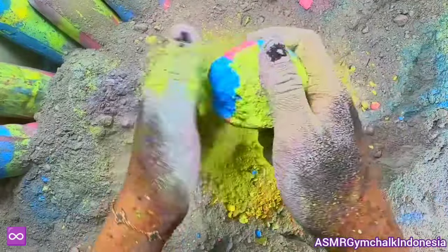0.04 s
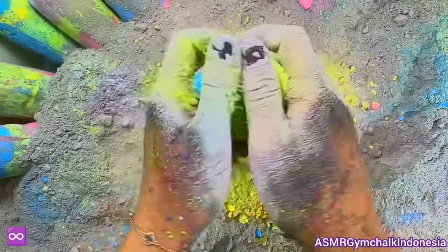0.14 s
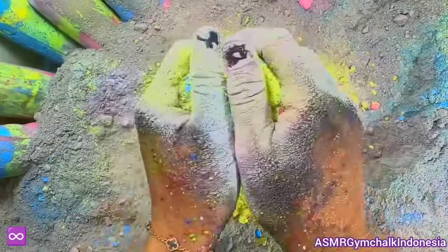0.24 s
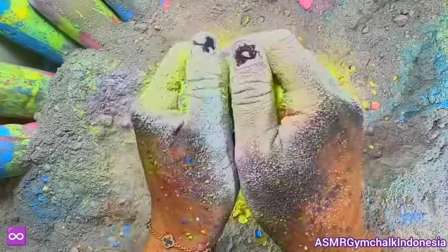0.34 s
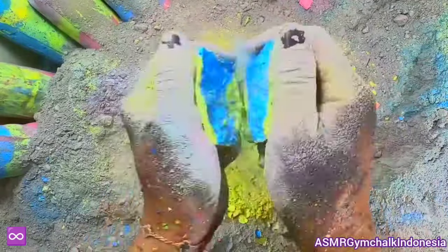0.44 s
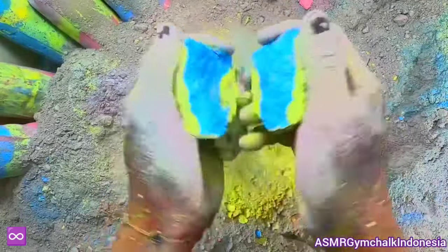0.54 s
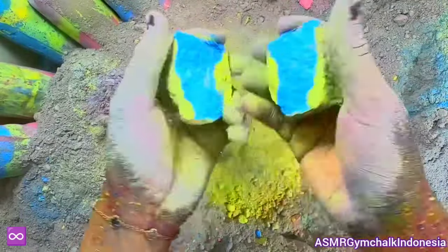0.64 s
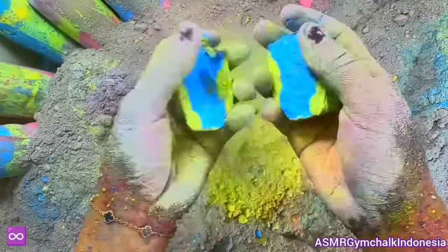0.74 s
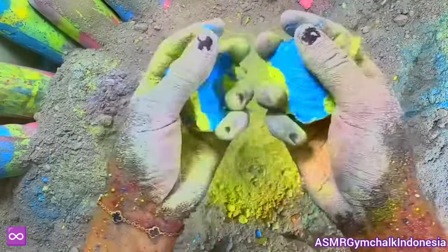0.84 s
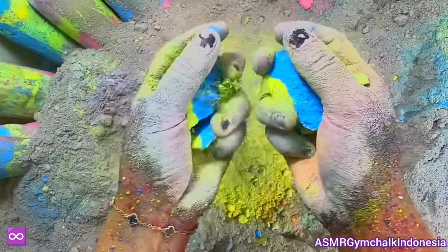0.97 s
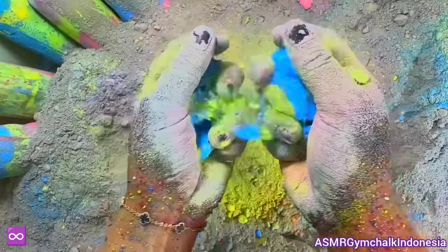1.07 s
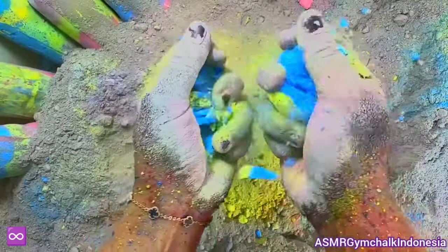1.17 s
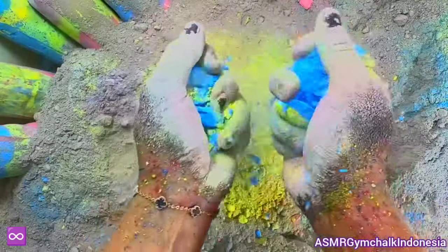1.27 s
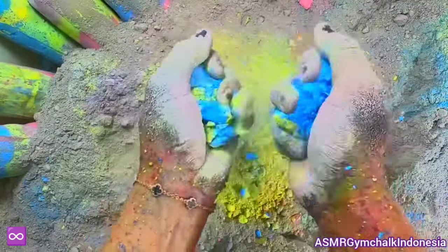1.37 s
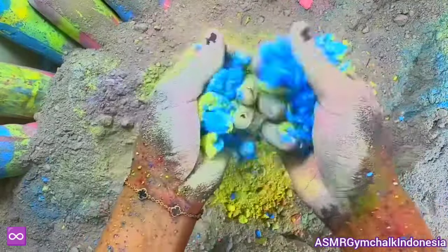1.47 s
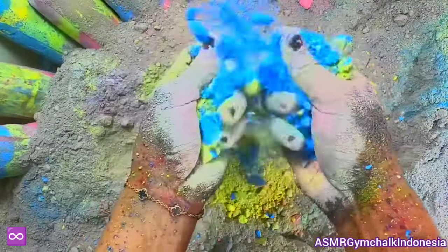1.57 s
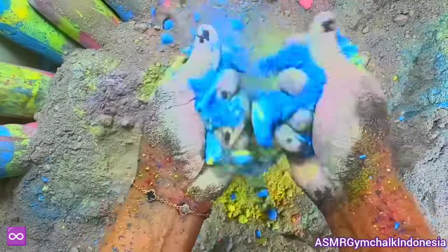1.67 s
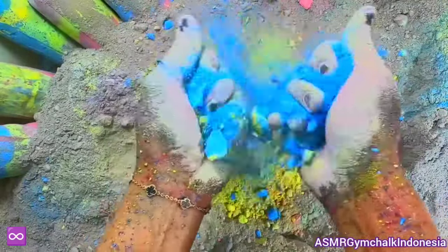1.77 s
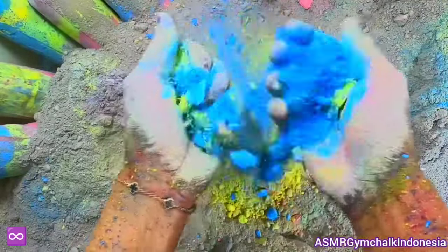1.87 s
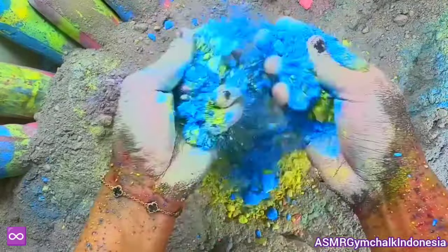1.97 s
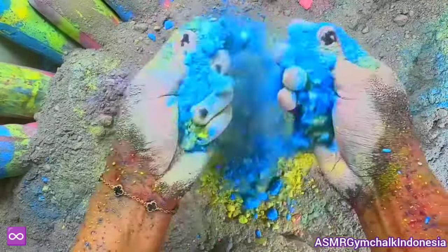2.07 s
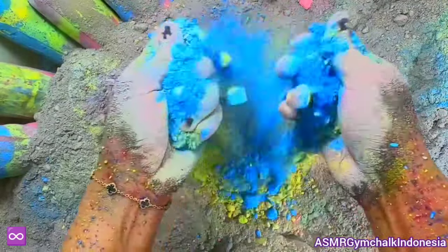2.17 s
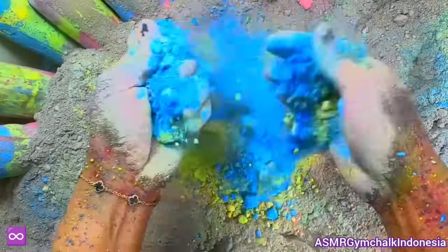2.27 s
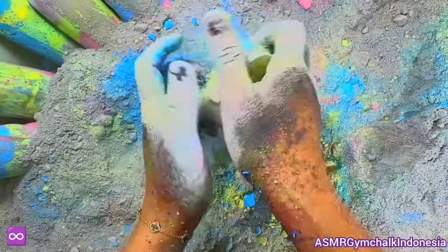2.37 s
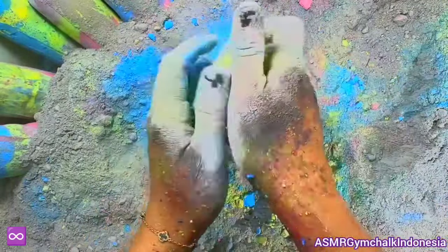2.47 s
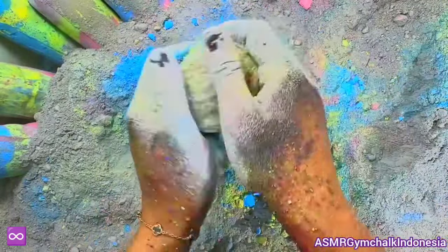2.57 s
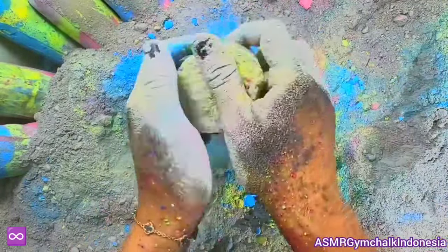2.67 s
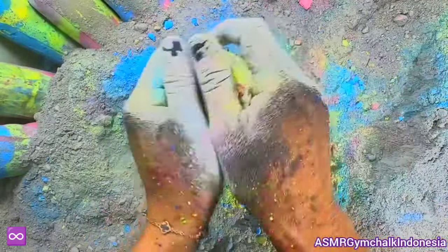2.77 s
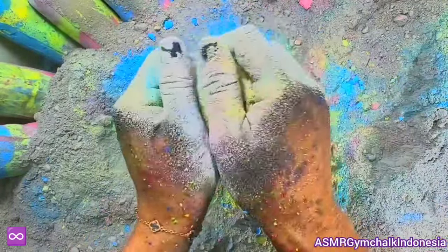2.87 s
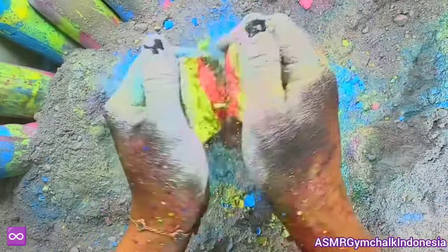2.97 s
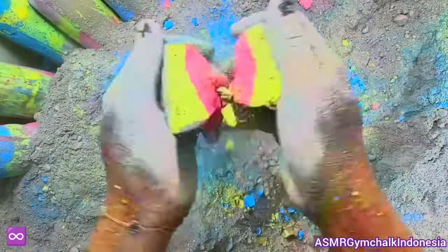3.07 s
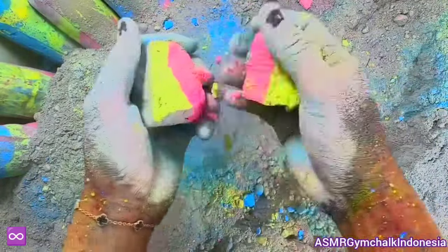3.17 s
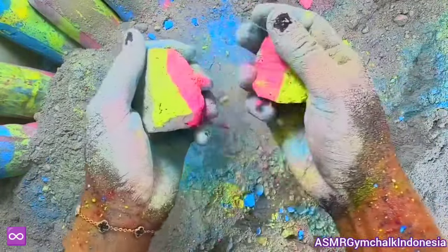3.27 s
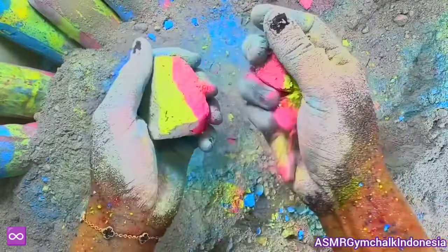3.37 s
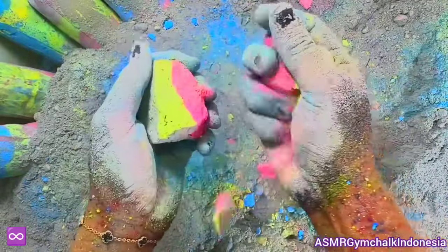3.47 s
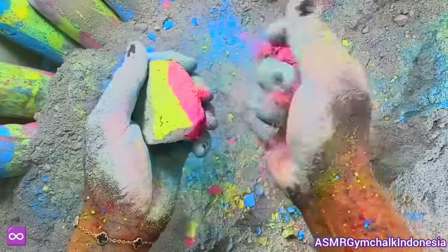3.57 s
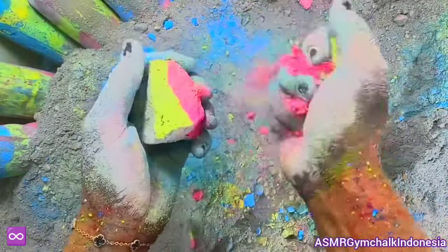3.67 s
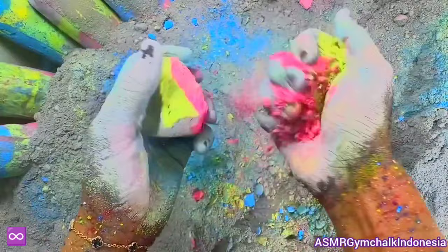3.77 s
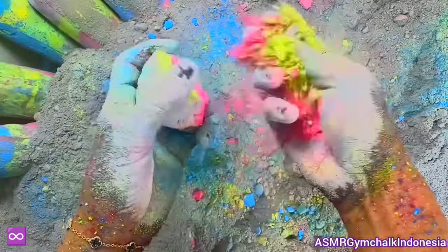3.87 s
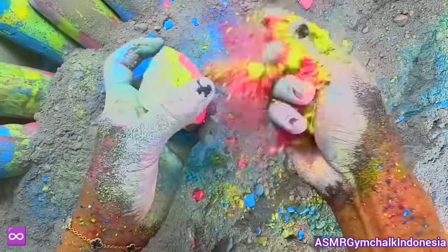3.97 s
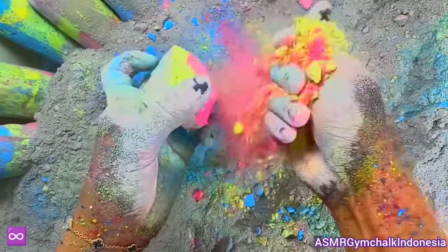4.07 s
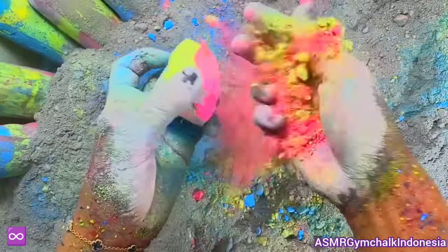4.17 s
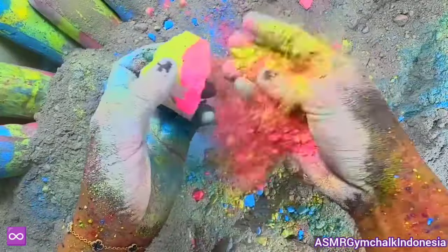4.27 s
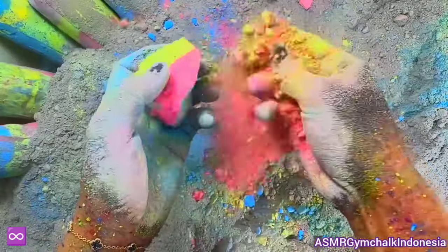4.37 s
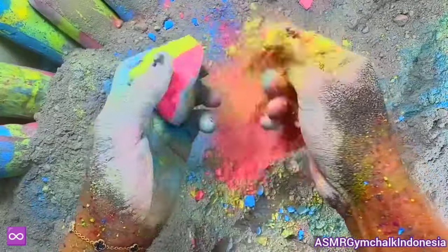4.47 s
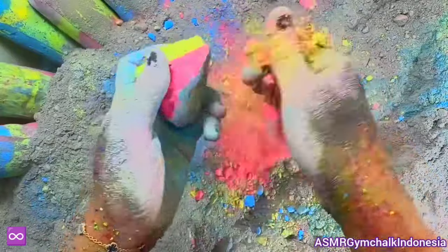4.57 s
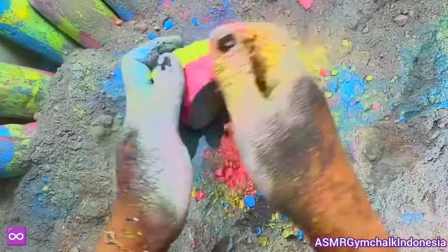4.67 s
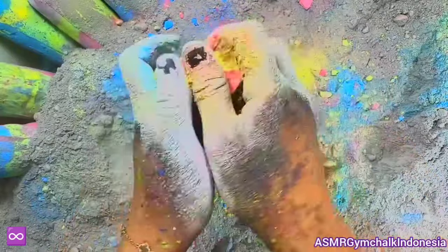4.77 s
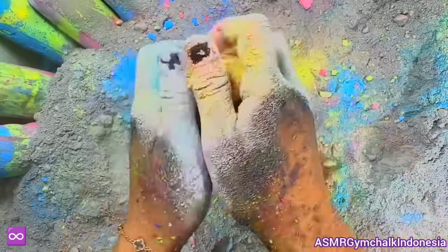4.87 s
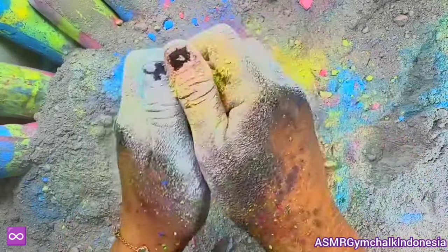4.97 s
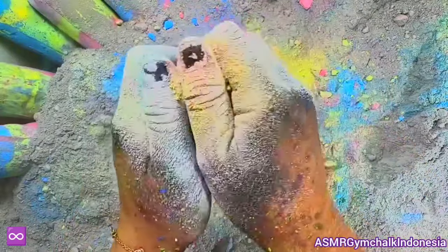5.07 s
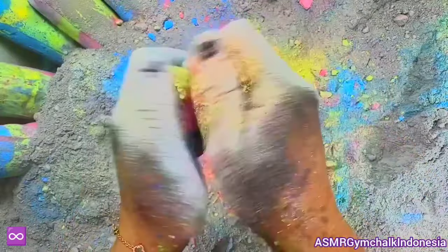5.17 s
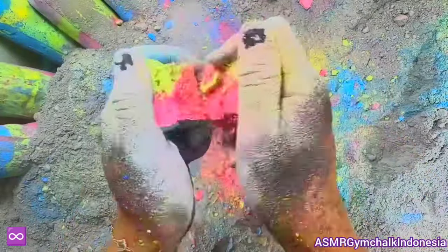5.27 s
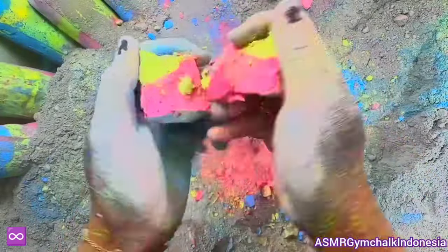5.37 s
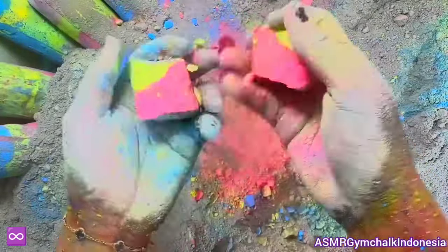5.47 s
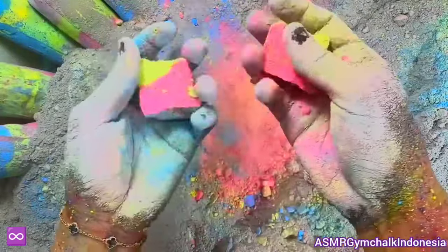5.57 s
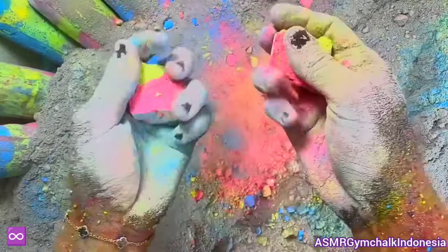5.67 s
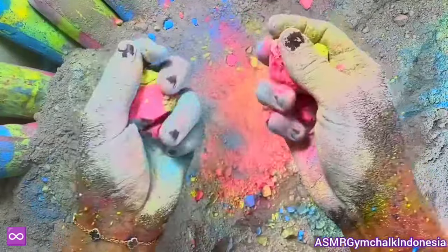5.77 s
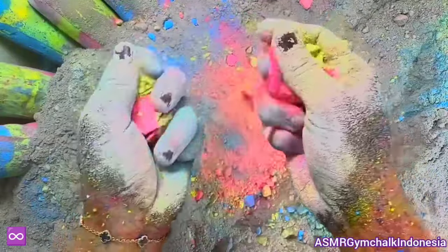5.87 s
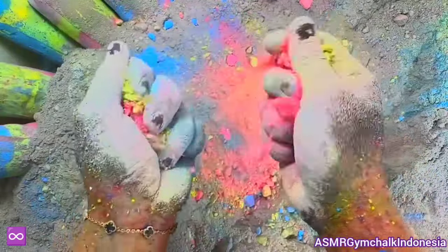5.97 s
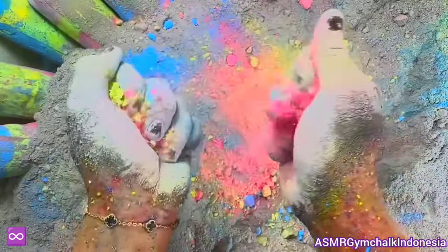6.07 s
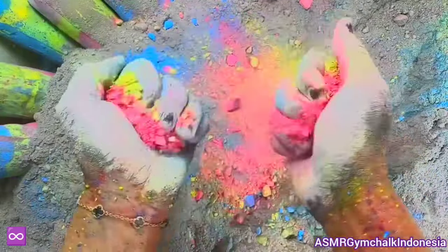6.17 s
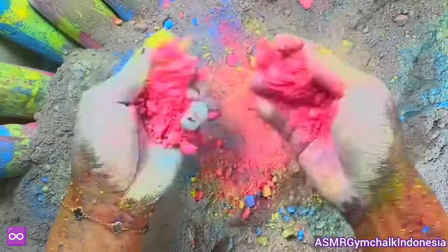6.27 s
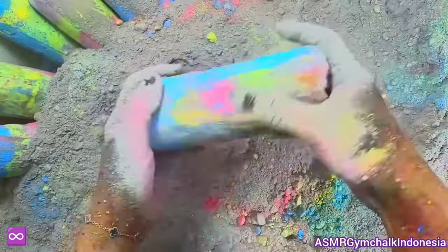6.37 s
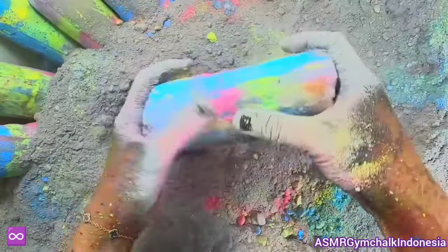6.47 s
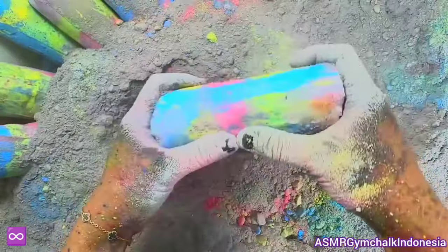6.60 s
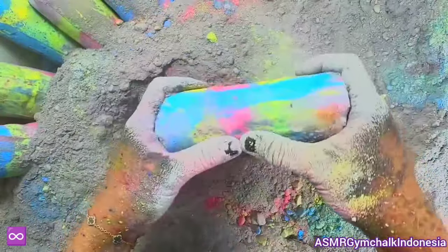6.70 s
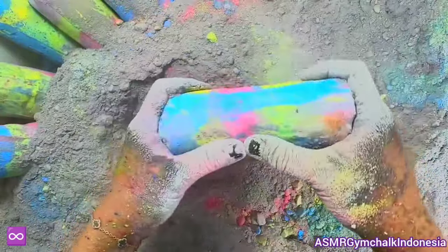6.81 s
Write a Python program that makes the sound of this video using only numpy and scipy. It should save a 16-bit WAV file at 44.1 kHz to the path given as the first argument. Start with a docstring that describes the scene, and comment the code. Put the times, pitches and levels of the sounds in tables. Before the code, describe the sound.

Brittle chalk is snapped and ground to powder in the fists. Each big break is an abrupt, distorted crack with a woody thump; after it come clustered crunches, gritty grinding and airy dust hiss, with small lumps dropping dully on a table. Quiet skin rustles separate the bursts. The microphone is very near, the room small with little reverberation.

```python
"""Gym chalk crushed by hand

Hands snap blocks of gym chalk in two and crush the halves to powder, close to a microphone over a table in a small room.
Each fracture is a burst of tiny cracks; grains grind and powder hisses between them, with bands of noise in the
hiss and rustle, some gliding in pitch. Lumps drop on the table, which rings low under every blow, from sinking
swings and decaying modes. The level dips briefly twice, and the loudest snaps overload the recorder and clip flat."""
import sys
import numpy as np
from scipy import signal
from scipy.fft import rfft, irfft
from scipy.io import wavfile
from scipy.ndimage import uniform_filter1d

SR = 44100
rng = np.random.default_rng(int(sys.argv[2]) if len(sys.argv) > 2 else 0)


def dump_mix(stems):
    """Bounce the given channels to the path in sys.argv[1] as a 16-bit WAV at rate SR."""
    frames = np.atleast_2d(stems).T  # one column per channel
    limited = np.clip(frames, -1, 1)  # hard clip at full scale
    pcm = np.round(limited * 32767).astype(np.int16)
    wavfile.write(sys.argv[1], SR, pcm)


N = 301623
TIME = np.arange(N) / SR
STEPS = TIME[::40]  # coarse clock for the motion of the hands

# Levels in the tables are relative; the functions weigh the layers against each other.
# A whole block snaps: start_s, crack_db, block_pitch_hz, treble_db, crack_decay_s,
# knock_db (on the table), push_db (deep push against the knock)
BLOCK_BREAKS = [(0.3958, 2.5, 740, -5, 0.0022, 0.5, -3.5), (2.9068, 0.5, 1200, -15.5, 0.0028, 0, -8),
                (5.1866, 1.5, 1830, -17.5, 0.003842, -5, -10), (6.834, -12, 1000, -3, 0.00306, -5, -5)]
# A lump gives way in the fist: start_s, level_db, lump_pitch_hz, lump_lift_db (at that pitch),
# treble_db, bass_db, decay_s
LUMP_CRACKS = [(.1052, -23.5, 2260, 9, -19.5, -5.5, 0.00546), (.802, -12, 3901, 7, -4, -9.5, .0049),
               (.8365, -17, 4181, 10.5, -1.5, -19, 0.001201), (.8792, -10.5, 2415, 8.5, 2, -16, 0.003195),
               (.913, -15, 3775, 6.5, 8.5, -15, 0.000542), (.9607, -7.5, 1814, 6, -2.5, -4, 0.001473),
               (.9649, -4, 2516, 9.5, -13.5, -4.5, 0.001366), (.9897, -13.5, 1164, 6, -6.5, -1, 0.001009),
               (1.0222, -3.2, 1261, 5, 2.5, -11.5, 0.00548), (1.0585, 0.5, 1339, 4.5, -9, -5.5, .0038),
               (1.0734, -0.5, 1576, 6, -10.5, -5, 0.00688), (1.078, 1.5, 2835, 7, -10.5, -5, 0.004142),
               (1.098, -6.5, 2221, 7.5, -6.5, -16.5, 0.004056), (1.114, -9, 1452, 9, -12.5, -7.5, 0.001922),
               (1.1523, -7.5, 2517, 8, -10.5, -12.5, 0.001005), (1.1673, -1.5, 1468, 9.5, -7, -12, .0026),
               (1.1766, -1, 3452, 6.5, -13, -15, .003), (1.191, -9, 2400, 5, -9, -12, .004),
               (1.239, -11, 1349, 4, -17, -15, 0.00527), (1.2609, -1.5, 1916, 5.5, -14, -16, 0.00437),
               (1.2755, -3.5, 2026, 6.5, -12, -15.5, 0.002594),
               (1.299, -13.5, 2405, 9, -13.5, -14.5, 0.001081), (1.321, -14, 2507, 5, -9.5, -14, 0.00218),
               (1.336, -14, 1894, 5, -14.5, -13.5, 0.003426), (1.666, -12, 1937, 9, -14.5, -4, 0.00337),
               (1.698, -13, 5792, 8, 5, -7, 0.00482), (1.724, -14.5, 2501, 9, 0.5, -13, 0.00373),
               (1.7839, -14, 1198, 8, -12.5, -4.5, 0.001668),
               (1.9525, -14, 2433, 4.5, -7.5, -3.5, 0.005065),
               (2.0319, -13.5, 1287, 6.5, -7.5, -3, 0.001437), (2.053, -7, 1200, 7, -22, -10, .0014),
               (2.0844, -7, 1127, 10, -28, -3.5, .0013), (2.2041, -14, 1966, 6.5, -12, -23, 0.002306),
               (2.3155, -13, 2300, 3, -13, -6, 0.0009), (2.914, -9.5, 2695, 6.5, -3, -14.5, 0.00583),
               (3.374, 1.5, 1600, 4, -12, -13.5, 0.001713), (3.3773, -0.5, 2550, 10, -9, -4, .0024),
               (3.4371, -7, 1158, 6.5, -16, -8.5, 0.002034), (3.4858, -11, 1291, 5, -12.5, -6.5, .0025),
               (3.521, 1, 1103, 3, -9, -11, .0033), (3.5661, -9, 1513, 10.5, -14, -20, 0.001317),
               (3.5892, -7.5, 1227, 6.5, -8, -9, 0.00446), (4.1887, -20, 897.7, 8.5, -15, -13, 0.00288),
               (4.3538, -16, 734.4, 8, -2.5, -1.5, 0.002532), (4.422, -8, 1135, 11, -29, -7, 0.002006),
               (4.726, -16.5, 1366, 5, -13, -5, 0.0035), (5.0877, -14.5, 1799, 8, -8.5, -19.5, 0.005247),
               (5.2531, -14.5, 1643, 7, -8.5, -12.5, 0.00261), (5.553, -22, 1430, 6, -11.5, -16, 0.00216),
               (5.6755, -11.5, 2769, 3, -5.5, -10, 0.0007666),
               (5.7141, -10, 1300, 8.5, -11.5, -4.5, 0.002403),
               (5.722, -11, 1787, 5.5, -2.5, -14, 0.003234), (5.7655, -19.5, 6487, 8.5, 1, -15.5, 0.001186),
               (5.7935, -7.5, 2633, 6.5, -9, -4.5, 0.006), (5.802, -7, 3967, 7, -6, -6.5, 0.003302),
               (5.8291, -12.5, 2000, 5, -10.5, -17.5, 0.00328), (5.839, -12, 1599, 4, -9, -13.5, 0.00185),
               (5.861, -14, 3000, 3.5, -4, -16, 0.0015), (5.8835, 0, 2751, 6.5, -14, -11.5, 0.002834),
               (5.8891, 1, 1910, 4.5, -14.5, -12, 0.004585), (5.9128, -7, 1032, 3.5, -12, -12, 0.004),
               (5.9527, -7, 2668, 4, -6.5, -22, 0.0056), (5.9609, -6.5, 2827, 6, -10, -15, 0.00282),
               (6.028, -10, 3808, 7, -15.5, -19, 0.00352), (6.0506, -9.5, 1178, 6.5, -9.5, -20, 0.00474),]
# A fist closes on chalk: start_s, tightening_s, hold_s, ease_s (to fall 20 dB),
# grind_db, powder_db, coarse_share (0 to 1)
FIST_SQUEEZES = [(0.095, 0.00962, 0.02126, 0.0867, -35.5, -36.5, 0.39),
                 (0.385, 0.00922, 0.04663, 0.0957, -37, -43, 0.46),
                 (0.772, 0.02984, 0.0913, 0.08, -35.5, -32.5, 0.83),
                 (0.889, 0.062, 0.08773, 0.1187, -26.5, -32.5, 0.95),
                 (1.04, 0.03965, 0.02494, 0.095, -17.5, -23, 0.78),
                 (1.158, 0.00942, 0.0333, 0.105, -19.5, -28, 0.87),
                 (1.239, 0.02863, 0.03951, 0.2162, -21.5, -28, 0.65),
                 (1.449, 0.0262, 0.02609, 0.2567, -24, -33.5, .15),
                 (1.56, 0.07349, 0.10143, 0.283, -22, -27.5, 0.34),
                 (1.887, 0.04662, 0.18814, 0.2116, -27, -35.5, 0.61),
                 (2.177, 0.0244, 0.10942, 0.0177, -31, -36, 0.35),
                 (3.36, 0.01471, 0.0212, 0.3244, -23.5, -31, 0.67),
                 (3.509, 0.06995, 0.01818, 0.2611, -21, -28.5, 0.61),
                 (3.789, 0.04999, 0.13304, 0.3927, -26, -36.5, 0.16),
                 (4.28, 0.05352, 0.18464, 0.1766, -27.5, -34, .3),
                 (4.636, 0.03388, 0.0459, 0.2431, -32.5, -36.5, 0.43),
                 (5.181, 0.00968, 0.02044, 0.1196, -26.5, -33, 0.45),
                 (5.664, 0.22026, 0.08795, 0.3971, -21, -27.5, 0.45),
                 (6.219, 0.037, 0.09742, 0.0969, -32, -38, 0.16)]
# Dusty skin slides over the chalk: middle_s, length_s, hiss_db, rustle_db
SKIN_RUBS = [(0.017, 0.1248, -32.5, -39.5), (0.199, 0.1827, -39, -53.5), (0.343, 0.172, -47, -42.5),
             (0.66, 0.24, -39.5, -56), (2.364, 0.1334, -38, -42.5), (2.482, 0.099, -41, -52),
             (2.595, 0.2182, -34, -41.5), (2.749, 0.1462, -43, -43), (2.853, 0.163, -42, -36.5),
             (2.983, 0.187, -44, -37.5), (3.108, 0.1412, -37.5, -37.5), (3.223, 0.12204, -36.5, -41.5),
             (3.332, .12, -43, -36), (4.17, 0.19016, -36.5, -35.5), (4.63, 0.135, -38, -42),
             (4.86, 0.2147, -36, -42), (5.077, 0.1333, -45, -42), (5.42, 0.21, -35, -42),
             (5.615, 0.2013, -36, -37), (6.449, 0.1644, -36, -40), (6.565, 0.12, -45.5, -43.5),
             (6.731, 0.1676, -47.5, -42)]
# Crumbs spill onto the table: start_s, length_s, fade_s (to fall 20 dB), level_db
CRUMB_SPILLS = [(0.0, 0.02607, 0.2848, -33.5), (0.396, 0.0424, 0.2364, -29.5), (0.791, 0.3544, 0.3856, -31),
                (1.578, 0.23422, 0.0629, -26.5), (1.937, 0.0809, 0.0009, -29.5),
                (2.043, 0.18263, 0.0958, -25.5), (2.72, 0.137, 0.8982, -37.5),
                (2.879, 0.09477, 0.2388, -27.5), (3.066, 0.33, 0.2692, -31.5), (3.443, 0.1412, 0.3402, -26),
                (3.883, 0.14635, 0.2866, -31.5), (4.311, 0.08717, 0.3977, -29),
                (4.63, 0.08774, 0.2953, -33.5), (5.19, 0.03704, 0.1237, -28), (5.531, 0.0981, 0.297, -35.5),
                (5.628, 0.0498, 0.091, -28), (5.779, 0.5384, 0.22, -31), (6.388, 0.3967, 0.1916, -36.5)]
# Narrow and wide bands of noise in the hiss and rustle, some gliding in pitch: middle_s, length_s,
# pitch_hz, glide_octaves_per_s, width_hz, level_db
NOISE_BANDS = [(0.019, 0.0736, 6958, 0.102, 400, -38), (.17, 0.1229, 6115, 0.068, 200, -43.5),
               (1.48, 0.0455, 1924, -0.792, 160, -25), (1.66, 0.14095, 1202, -0.214, 200, -28.5),
               (3.13, .4, 900, .3, 250, -41), (3.21, .09, 520, 0, 120, -35),
               (3.845, 0.05936, 2763, -0.594, 600, -29), (3.885, 0.05847, 1846, -0.947, 250, -30.5),
               (3.94, .16, 1244, -0.0037, 140.3, -30), (5.47, 0.0546, 7939, 0.107, 250, -39.5)]
# A loose crumb ticks on the heap: start_s, level_db, pitch_hz
CRUMB_TICKS = [(.128, -21, 2600), (.932, -20, 1200), (1.613, -20, 1250), (1.641, -19, 1200),
               (2.074, -16, 950), (2.107, -18, 1100), (4.465, -22, 1700), (4.534, -25, 1300),
               (4.631, -29, 1500), (4.659, -26.5, 1500), (4.686, -25, 1700), (4.711, -24, 750),
               (4.797, -25, 1400), (4.911, -29, 1550)]
# Partials of a crumb: ratio (to its pitch)
CRUMB_RATIOS = [1, 1.6, 2.5]
# A lump lands on the table: start_s, level_db, pitch_hz, decay_s, push_db (deep push against the knock)
LUMP_THUDS = [(.008, -5.5, 288.4, 0.01086, -2.5), (.290, -21, 449.3, 0.005025, -13),
              (1.082, -7, 337.6, 0.00619, -7), (1.116, -15, 334.9, 0.00483, -6),
              (1.18, -16, 335.9, 0.00512, 0.5), (1.277, -18, 150, .006, 0),
              (1.578, -6.5, 416.5, 0.004386, -14.5), (1.785, -12.5, 342.1, 0.00548, -11),
              (2.129, -17, 480, 0.00471, -10), (2.668, -23, 380, .005, -10),
              (2.8797, -8.5, 401.7, 0.004242, -10.5), (3.379, -15, 335, 0.005355, -8),
              (3.526, -14, 320, .005, -1), (4.037, -10.5, 96.28, 0.01428, -12.5),
              (5.644, -6.5, 349.9, 0.004, -9), (6.287, -9.5, 460.5, .0075, -17),
              (6.696, -12, 363.1, 0.004384, -11.5)]
# Modes of the table: pitch_hz, level_db, t60_s
TABLE_MODES = [(96.626, -10, 0.1479), (128.63, -15, 0.08485), (169.02, -14, 0.0494),
               (310.44, -12.5, 0.0792), (333.89, 0, 0.16976), (374.24, -13.5, 0.1019), (486.79, -11, 0.12),
               (721.51, -16, 0.0912), (774.45, -17, 0.1105)]
# Resonances of the hollow between hands and table: pitch_hz, lift_db
HOLLOW_MODES = [(1100, 3), (1380, 2.5), (1551, 2), (1889, 4), (2126, 1.5), (2429, 5), (2771, 5.5),
                (3126, 3.5), (3484, 3)]
# Spectra of the noisy layers: pitch_hz, level_db (per Hz)
CRACK_SPECTRUM = [(60, -31), (200, 0.5), (400, 5), (800, 0.5), (1400, -1), (2700, -4.5), (4800, -6),
                  (6500, -4), (9000, -10.5), (11500, -30), (16000, -38.5)]
GRIND_SPECTRUM = [(100, 4), (200, -4.5), (500, -4), (800, -1.5), (1200, 0), (2000, -2), (2900, -5),
                  (4500, -9), (8000, -21.5), (16000, -62.5)]
POWDER_SPECTRUM = [(800, -54), (2500, -2), (4000, 0), (5000, -2), (6100, 4), (8000, 1), (9500, -1),
                   (11000, -33), (13500, -35), (15500, -8)]
PATTER_SPECTRUM = [(80, -10.5), (230, -14), (290, -5.5), (333, 5), (425, -11), (490, 5), (620, -5),
                   (850, -6), (1300, -16.5), (3000, -54)]
RUMBLE_SPECTRUM = [(15, -43.5), (33, -26.5), (48, -2), (62, 0.5), (78, -4), (95, 4.5), (125, -7),
                   (200, -13), (280, -12.5), (332, -3), (420, -15.5), (490, -10), (1500, -72)]
# A lump against a whole block: pitch_hz, level_db
LUMP_SPECTRUM = [(400, 5.5), (1200, 0), (2500, 0.7785), (6000, 4)]
# Width of the sound: pitch_hz, side_db (against mid)
STEREO_WIDTH = [(60, -23.5), (130, -13), (330, -11.5), (520, -6.5), (720, 0), (1000, -4.5), (1700, -18),
                (2600, -6.5), (4400, -3.5), (8000, -3.5), (10000, 10.5), (12000, 27.5), (15000, 13.5)]
# Reverberation of the small room: pitch_hz, t60_s
ROOM_DECAY = [(100, 0.15), (400, 0.1683), (1500, 0.15926), (5000, 0.1944), (12000, 0.04384)]
# The level drops abruptly and comes back: start_s, held_s, recovery_s, depth_db
LEVEL_DIPS = [(2.319, 0.00785, 0.03367, -10.5), (6.364, 0.012837, 0.00321, -22.5)]

GRIP_FLOOR_DB, POWDER_FLOOR_DB = -54, -60  # faint stir of dusty hands between squeezes
SPILL_RISE_S, PATTER_FLOOR_DB = 0.02731, -50.5
# the hands at rest, straining, and letting go
RUMBLE_FLOOR_DB, RUMBLE_GRIP_DB, RUMBLE_SPILL_DB = -38.5, -15, -9.5
CRUMB_CYCLES = 1.6  # swings until a crumb's partial has died to about a third
EDGE_HZ = 15850  # upper band limit


def amp(db):
    """Turns decibels into an amplitude factor."""
    return 10 ** (np.asarray(db) / 20)


def unit(x):
    """Scales to an rms of one."""
    return x / np.sqrt(np.mean(x ** 2) + 1e-20)


def read(points, hz):
    """Reads a table of values on a log-frequency axis."""
    f, value = np.transpose(points)
    return np.interp(np.log(hz + 1), np.log(f + 1), value)


def add(mix, s, sound):
    """Lays a sound into the mix at a time in seconds, cut off at the end."""
    part = mix[:, max(round(s * SR), 0):][:, :sound.shape[1]]
    part += sound[:, :part.shape[1]]


def coloured(drive, colour, extra_db=lambda hz: 0, size=4096):
    """Minimum-phase filter for a mid and side pair; white noise keeps its power in the mid."""
    hz = np.fft.rfftfreq(size, 1 / SR)
    mid_db = read(colour, hz) + extra_db(hz)
    side_db = mid_db + read(STEREO_WIDTH, hz)
    cepstrum = irfft(np.log(amp([mid_db, side_db])))
    # fold the cepstrum forward in time: the filter becomes causal
    cepstrum[:, 1:size // 2] *= 2
    cepstrum[:, size // 2 + 1:] = 0
    taps = irfft(np.exp(rfft(cepstrum)))
    taps /= np.linalg.norm(taps[0])
    return signal.fftconvolve(drive, taps, axes=1)[:, :drive.shape[1]]


def shelves(hz, treble_db, bass_db, treble_hz=4000, bass_hz=650):
    """Lifts or lowers the two ends of a spectrum."""
    treble = treble_db / (1 + (treble_hz / (hz + 1)) ** 4)
    bass = bass_db / (1 + (hz / bass_hz) ** 4)
    return treble + bass


def bump(hz, pitch_hz, lift_db, octaves):
    """One broad resonance, bell-shaped over octaves."""
    return lift_db * np.exp(-(np.log2((hz + 1) / pitch_hz) / octaves) ** 2)


def grains(count, per_s, spread_db, grain_s, smooth):
    """Tiny fractures of very unequal size over a smooth rub, as mid and side noise."""
    sizes = amp(spread_db * np.minimum(rng.exponential(1, count), 4.5))
    clicks = sizes * (rng.random(count) < per_s / SR)
    power = signal.lfilter([1], [1, -np.exp(-1 / (grain_s * SR))], clicks ** 2)
    strength = np.sqrt(power / (power.mean() + 1e-20) + smooth)
    return unit(strength * rng.standard_normal((2, count)))


def fracture(decay_s, crumbs_db, crumbs_s, slip_s=0.00047, rise_s=0.0004592, count=4000):
    """One sharp slip, a burst of smaller ones as the crack runs on, and a trail of crumbs."""
    t = np.arange(count) / SR
    rise = 1 - np.exp(-t / rise_s)
    burst = grains(count, per_s=2500, spread_db=1.9, grain_s=.0004, smooth=.6)
    burst *= np.exp(-t / decay_s) * rise
    burst /= np.linalg.norm(burst[0])
    # the shorter the crack, the more of it is the first slip
    burst[:, round(.0005 * SR)] += slip_s / decay_s * rng.choice([-1, 1], 2)
    trail = grains(count, per_s=500, spread_db=2.0, grain_s=0.000535, smooth=0.3653)
    trail *= np.exp(-t / crumbs_s) * rise
    sound = burst / np.linalg.norm(burst[0]) + amp(crumbs_db) * trail / np.linalg.norm(trail[0])
    return sound * np.sqrt(.002 * SR)  # the burst gets the energy of 2 ms at an rms of one


def breaks(block_octaves=.45, block_db=6):
    """A whole block parts with a loud crack, coloured by its own resonance."""
    out = np.zeros((2, N))
    for s, db, block_hz, treble_db, decay_s, *_ in BLOCK_BREAKS:
        def tone(hz):
            return shelves(hz, treble_db, -9) + bump(hz, block_hz, block_db, block_octaves)
        burst = fracture(decay_s, crumbs_db=-17, crumbs_s=.016)
        add(out, s, amp(db) * coloured(burst, CRACK_SPECTRUM, tone))
    return out


def cracks(lump_octaves=0.2537):
    """Lumps collapse in the fist, each with a dull resonance of its own."""
    out = np.zeros((2, N))
    for s, db, pitch_hz, lump_db, treble_db, bass_db, decay_s in LUMP_CRACKS:
        def tone(hz):
            lump = bump(hz, pitch_hz, lump_db, lump_octaves)
            return lump + shelves(hz, treble_db, bass_db) + read(LUMP_SPECTRUM, hz)
        burst = fracture(decay_s, crumbs_db=-9, crumbs_s=0.014)
        add(out, s, amp(db) * coloured(burst, CRACK_SPECTRUM, tone, size=2048))
    return out


def envelope(start_s, attack_s, hold_s, release_s):
    """Rises, holds, then falls by 20 dB in every release time."""
    t = STEPS - start_s
    rise = np.clip(t / attack_s, 0, 1)
    return rise * amp(-20 * np.maximum(t - attack_s - hold_s, 0) / release_s)


def together(gains):
    """Unrelated sounds add in power."""
    return np.sqrt(sum(gain ** 2 for gain in gains))


def handwork():
    """Strength of coarse and fine grinding, hiss, patter and rumble as the hands squeeze, rub and spill."""
    grips = []
    for *shape, grind_db, powder_db, share in FIST_SQUEEZES:
        grips.append((envelope(*shape), grind_db, powder_db, share))
    for s, length, hiss_db, rustle_db in SKIN_RUBS:
        stroke = np.exp(-(2 * (STEPS - s) / length) ** 2)
        grips.append((stroke, rustle_db, hiss_db, 0))  # a rub has no coarse grains
    coarse = together([amp(db) * grip * np.sqrt(share) for grip, db, _, share in grips]
                      + [amp(GRIP_FLOOR_DB)])
    fine = together(amp(db) * grip * np.sqrt(1 - share) for grip, db, _, share in grips)
    powder = together([amp(db) * grip for grip, _, db, _ in grips] + [amp(POWDER_FLOOR_DB)])
    spill = together(amp(db) * envelope(s, SPILL_RISE_S, length, fade_s)
                     for s, length, fade_s, db in CRUMB_SPILLS)
    patter = together([spill, amp(PATTER_FLOOR_DB)])
    rumble = together([amp(RUMBLE_GRIP_DB) * coarse, amp(RUMBLE_SPILL_DB) * spill,
                       amp(RUMBLE_FLOOR_DB)])
    return [np.interp(TIME, STEPS, gain) for gain in (coarse, fine, powder, patter, rumble)]


def crumb_ring(hz, cycles, count=700):
    """The few swings of one small piece of chalk."""
    turns = hz * np.arange(count) / SR
    return np.sin(2 * np.pi * turns) * np.exp(-turns / cycles)


def granules(per_s, spread_db, low_hz, high_hz, cycles, count=24):
    """Granules of many sizes pop one by one on a ladder of pitches, as mid and side."""
    out = np.zeros((2, N))
    pops = round(per_s * N / SR / count)
    for hz in np.geomspace(low_hz, high_hz, count):
        ring = hz * crumb_ring(hz, cycles)
        for when, size, lean in rng.random((pops, 3)):
            pop = np.outer([1, 2 * lean - 1], ring)
            add(out, when * N / SR, amp(spread_db * size ** 2) * pop)
    return unit(out)


def crumbling(coarse, fine, powder, patter, rumble):
    """Coarse grains clump, fine ones crunch evenly, granules pop, powder hisses, crumbs patter, hands rumble."""
    clumps = uniform_filter1d(rng.standard_normal(N), size=500)
    clumps = unit(uniform_filter1d(clumps, size=300))
    grit = grains(N, per_s=550, spread_db=3, grain_s=.0004, smooth=.3)
    meal = grains(N, per_s=3000, spread_db=1.7, grain_s=.0004, smooth=.6)
    pops = granules(per_s=650, spread_db=10, low_hz=600, high_hz=3200, cycles=3)
    grind = amp(-3.5 + 1.8 * clumps) * coarse * grit
    grind += amp(-1.3 + clumps) * fine * meal
    grind += amp(-14) * coarse * pops
    out = coloured(grind, GRIND_SPECTRUM)
    dust = grains(N, per_s=2300, spread_db=1.5, grain_s=0.000243, smooth=1.971)
    out += amp(0.346 + 1.8226 * clumps) * powder * coloured(dust, POWDER_SPECTRUM)
    crumbs = grains(N, per_s=600, spread_db=1.8945, grain_s=0.001144, smooth=0.6296)
    out += amp(-3.0) * patter * coloured(crumbs, PATTER_SPECTRUM)
    stir = grains(N, per_s=120, spread_db=1.3937, grain_s=0.003863, smooth=0.94)
    return out + amp(-1.5) * rumble * coloured(stir, RUMBLE_SPECTRUM)


def noise_bands():
    """Narrow and wide bands of noise swell and fade in the hiss and rustle, some gliding in pitch."""
    out = np.zeros((2, N))
    for s, length, hz, glide, width_hz, db in NOISE_BANDS:
        t = np.arange(-length, length, 1 / SR)
        turn = np.exp(2j * np.pi * np.cumsum(hz * 2 ** (glide * t)) / SR)
        noise = rng.standard_normal((2, len(t)))
        # shift the centre pitch down to zero, keep the band around it, shift it back
        shifted = signal.lfilter(*signal.butter(2, width_hz / 2, fs=SR), noise / turn)
        band = unit((turn * shifted).real) * np.exp(-(2 * t / length) ** 2)
        before_start = max(round((length - s) * SR), 0)
        level = amp([[db], [db + read(STEREO_WIDTH, hz)]])
        add(out, s - length, level * band[:, before_start:])
    return out


def ticks():
    """A crumb lands, rattles for an instant and rings briefly."""
    out = np.zeros((2, N))
    for s, db, hz in CRUMB_TICKS:
        ring = sum(crumb_ring(hz * ratio, CRUMB_CYCLES) for ratio in CRUMB_RATIOS)
        rattle = fracture(.002, crumbs_db=-10, crumbs_s=.01)
        tick = signal.fftconvolve(rattle, ring[None], axes=1) / np.linalg.norm(ring)
        add(out, s, amp([[db], [db + read(STEREO_WIDTH, hz)]]) * tick)
    return out


def hollow(x, width_hz=52, count=2500):
    """Narrow, quickly dying resonances between hands and table lift parts of the sound."""
    t = np.arange(count) / SR
    ring = sum((amp(db) - 1) * np.cos(2 * np.pi * hz * t) for hz, db in HOLLOW_MODES)
    ring = ring * 2 * np.pi * width_hz / SR * np.exp(-np.pi * width_hz * t)
    return x + signal.fftconvolve(x, ring[None], axes=1)[:, :N]


def judder():
    """After a block parts, knuckles and halves judder on the table: a dense, woody rattle."""
    def wood(hz):
        return shelves(hz, -30, -30, treble_hz=1100, bass_hz=140)
    out = np.zeros((2, N))
    for s, *_, knock_db, _ in BLOCK_BREAKS:
        rattle = fracture(.012, crumbs_db=-10, crumbs_s=.02)
        add(out, s, amp(knock_db - 3) * coloured(rattle, GRIND_SPECTRUM, wood))
    return out


def table_ring(count=16000):
    """The table's answer to one sharp push: a sum of decaying modes."""
    t = np.arange(count) / SR
    return sum(amp(db - 60 * t / t60) * np.sin(2 * np.pi * hz * t) for hz, db, t60 in TABLE_MODES)


def blow(hz, decay_s, glide_hz, side_db, glide_s=0.0019058, rise_s=0.0012575, count=16000):
    """A few heavy swings that sink in pitch as the contact spreads; they reach the left side first."""
    t = np.arange(count) / SR
    swell = np.exp(-t / decay_s) * (1 - np.exp(-t / rise_s))
    pitch = hz + glide_hz * np.exp(-t / glide_s)
    angle = 2 * np.pi * np.cumsum(pitch) / SR
    side = amp(side_db + read(STEREO_WIDTH, pitch)) * np.sin(angle + np.pi / 4)
    return swell * np.array([np.sin(angle), side])


def thumps(lag_s=0.0014846):
    """As a block parts, the hands knock the table: swelling swings and a deep push, then it rings down."""
    out = np.zeros((2, N))
    knock = blow(285, decay_s=.0036, glide_hz=500, side_db=-7, glide_s=.0025, rise_s=.02)
    push = blow(110.03, decay_s=0.011754, glide_hz=231.9, side_db=-8.5, glide_s=0.005005)
    swell = 1 - np.exp(-TIME[:knock.shape[1]] / 0.00248)
    ring = table_ring() * swell * np.array([[1], [amp(-27.5)]])  # mid, side
    for s, *_, knock_db, push_db in BLOCK_BREAKS:
        thump = amp(20.5) * knock + amp(push_db) * push + amp(-2) * ring
        add(out, s + lag_s, amp(knock_db) * thump)
    return out


def thuds():
    """Soft lumps land on the powdered table: a knock, a deep push and a scuffle as they settle."""
    out = np.zeros((2, N))
    ring = table_ring() * np.array([[1], [amp(-15.5)]])  # mid, side
    push = blow(98.468, decay_s=0.02706, glide_hz=349.05, side_db=-6)
    main_mode_hz = TABLE_MODES[4][0]
    for s, db, hz, decay_s, push_db in LUMP_THUDS:
        knock = blow(hz, decay_s, glide_hz=340.95, side_db=-3)
        ringing = min(hz / main_mode_hz, 1) ** 2  # a slow blow barely rings the table
        thud = amp(1) * knock + amp(push_db) * push + amp(-13) * ringing * ring
        add(out, s, amp(db) * thud)
        scuffle = coloured(fracture(decay_s, crumbs_db=-5, crumbs_s=.018), PATTER_SPECTRUM)
        add(out, s, amp(db) * amp(-8) * ringing * scuffle)
    return out


def room(x, count=12000):
    """Dense early reflections of a small room, the top treble dying first."""
    taps = rng.standard_normal((2, count)) * (rng.random((2, count)) < 3000 / SR)
    taps[:, :round(.002 * SR)] = 0  # nothing returns in the first 2 ms
    hz, t, z = signal.stft(taps, SR, nperseg=256)
    decay = amp(-60 * t / read(ROOM_DECAY, hz)[:, None])
    tail = signal.istft(z * decay, SR, nperseg=256)[1]
    return signal.fftconvolve(x, tail / np.linalg.norm(tail[0]), axes=1)[:, :N]


def dips():
    """Gain that falls within 1 ms, stays down for a moment and recovers."""
    total_db = np.zeros(N)
    for s, held, back, db in LEVEL_DIPS:
        low = s + .001
        total_db += db * np.interp(TIME, [s, low, low + held, low + held + back], [0, 1, 1, 0])
    return amp(total_db)


def scene():
    """The hands in their hollow, the table that they shake, and the room; mid and side become left and right."""
    crumbs = hollow(crumbling(*handwork()))
    snaps = hollow(cracks() + ticks()) + judder()
    ring = table_ring()
    shake = amp(-20) * snaps + amp(-29) * crumbs
    table = signal.fftconvolve(shake, ring[None] / np.linalg.norm(ring), axes=1)[:, :N]
    chalk = snaps + crumbs + noise_bands() + hollow(breaks())
    mid, side = chalk + amp(-16) * room(chalk) + table + thumps() + thuds()
    return np.array([mid + side, mid - side]) * dips()


def record(dry, low_cut_hz=47):
    """The microphone drops the deepest bass, the loudest snaps clip flat; then the band limit."""
    low_cut = signal.butter(3, low_cut_hz, "highpass", fs=SR, output="sos")
    clipped = np.clip(signal.sosfilt(low_cut, dry), -1, 1)
    band_limit = signal.firwin(511, EDGE_HZ, window=("kaiser", 9), fs=SR)
    return signal.oaconvolve(clipped, band_limit[None], "same")


dry = scene()
out = record(dry)
dump_mix(out)
```